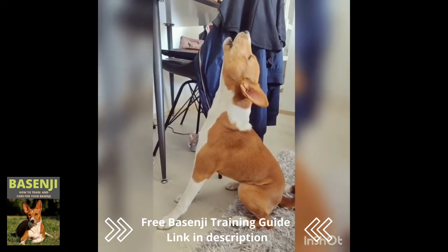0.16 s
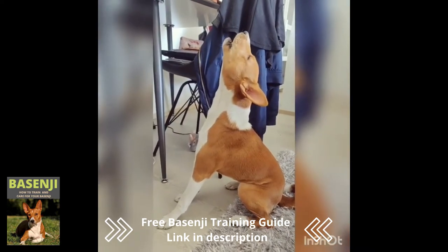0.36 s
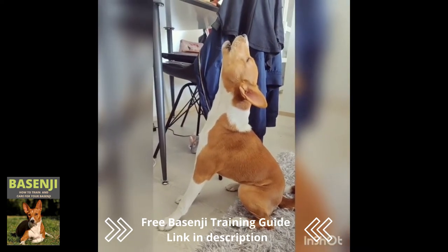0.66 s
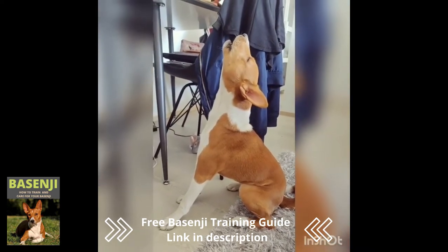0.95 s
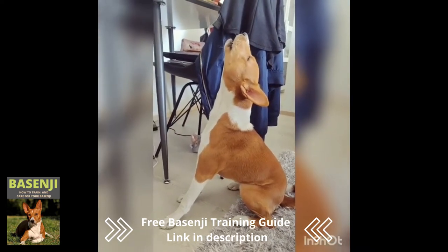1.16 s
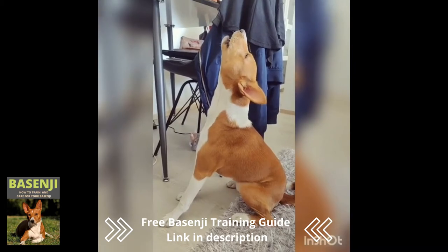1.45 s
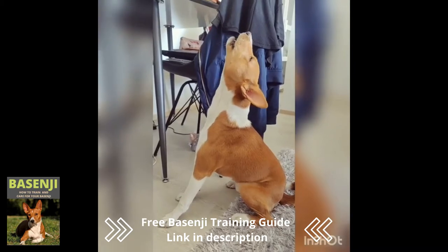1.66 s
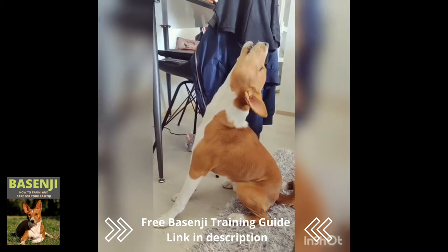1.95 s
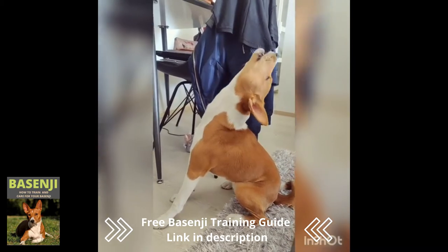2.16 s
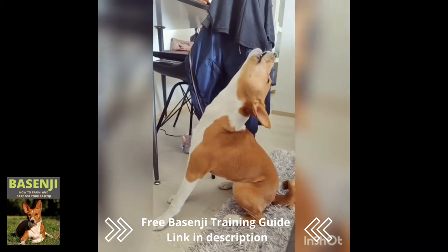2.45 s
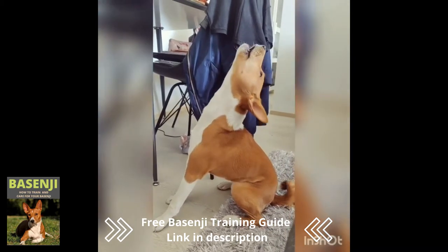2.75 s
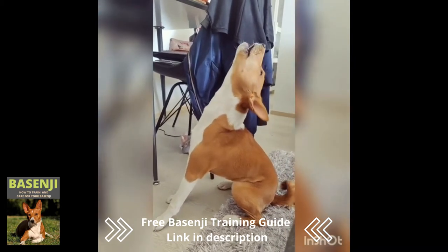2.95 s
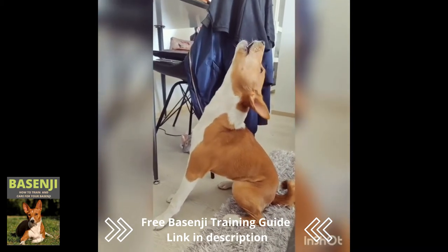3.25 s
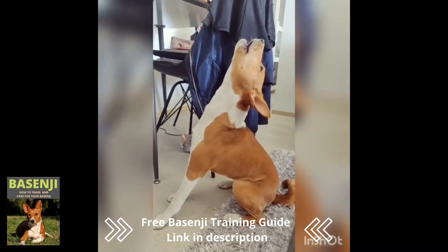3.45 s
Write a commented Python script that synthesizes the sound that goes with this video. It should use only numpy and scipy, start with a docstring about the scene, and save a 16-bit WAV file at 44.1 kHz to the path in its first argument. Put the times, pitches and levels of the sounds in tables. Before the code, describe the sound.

A dog howls twice in a small, slightly echoing room. The first call is smooth and falls gently; after a short gap, the second rises like a yodel, breaks with a rasp and settles on a held note.

```python
"""A small room, a dog yodelling: a long, nearly pure howl sinks and fades; a pause; a second call.
That one creaks, slides up, cracks to a lower register and holds on its second harmonic.
The vocal folds give the harmonics, the throat colours them and rasps, air fizzes in the muzzle.
Standing waves, set as left-right curves, push the low partials about as the pitch moves.
A faint rumble lies beneath."""
import sys
import numpy as np
from scipy import signal
from scipy.fft import rfft, irfft
from scipy.io import wavfile
from scipy.ndimage import uniform_filter1d, minimum_filter1d

SR = 44100
rng = np.random.default_rng(int(sys.argv[2]) if len(sys.argv) > 2 else 0)


def to_wav(s):
    """Save 16-bit WAV."""
    ch = np.atleast_2d(s).T  # columns
    pcm = np.round(np.clip(ch, -1, 1) * 32767)  # PCM
    wavfile.write(sys.argv[1], SR, pcm.astype(np.int16))


N = 158760
T = np.arange(N) / SR

# room decay: f/Hz, T60/s
ROOM_DECAY = [(150, 0.63), (600, 0.5), (2000, 0.46), (5000, 0.27), (12000, 0.092)]
# noise spectra: f/Hz, relative density/dB
RUMBLE_SPECTRUM = [(30, -4), (70, -7), (110, -2), (160, -3.5), (240, -8.5), (310, -2), (430, -16.5),
                   (600, -15.5), (1100, -15), (2000, -24), (5000, -36), (7500, -34), (12500, -45.5)]
FIZZ_SPECTRUM = [(1700, -36), (2500, -15.5), (3200, -3), (3700, -19.5), (4300, -2), (5200, -30),
                 (6700, -13), (7500, -22.5), (8600, -3), (10000, -21), (11000, -10.5), (12200, -10),
                 (13000, -18)]
RASP_SPECTRUM = [(100, -29.5), (330, -23), (520, -9), (700, -1), (830, 5.5), (960, 0), (1150, -16),
                 (1450, -34.5), (1880, -11), (2200, -38), (2600, -32.5), (3150, -18.5), (3650, -52),
                 (4350, -36.5), (5200, -69), (12000, -66)]
# noise envelopes: t/s, relative level/dB
FIZZ_ENVELOPE = [(.3, -65), (.85, -70), (1.2, -88.5), (2.06, -90), (2.12, -58.5), (2.35, -58.5),
                 (2.65, -59), (2.95, -57), (3.2, -66), (3.6, -67.5)]
HOWL_RASP_ENVELOPE = [(0, -43), (.3, -41.5), (.6, -41.5), (.8, -44.5), (.94, -46), (.965, -33),
                      (1.055, -34.5), (1.085, -46), (1.125, -45), (1.15, -62)]
YODEL_RASP_ENVELOPE = [(2.035, -64.5), (2.052, -42), (2.085, -37), (2.12, -39), (2.16, -54), (2.3, -50),
                       (2.57, -43), (2.6, -21), (2.628, -20), (2.655, -35), (2.72, -42), (2.85, -46),
                       (3.05, -44), (3.2, -46.5), (3.6, -47.5)]
# second fold oscillation: t/s, f/Hz, relative level/dB
SQUEAL_TRACK = [(2.57, 881, -38.5), (2.582, 862.5, -16), (2.592, 861, -29), (2.601, 857, -19.5),
                (2.612, 926, -26), (2.626, 927, -20.5), (2.655, 929, -29.5)]
# its sum tones: multiple of voice pitch added, relative level/dB
SQUEAL_SUM_TONES = [(0, 0), (1, -27), (2, -18), (4, -21)]
# notes: t/s, f/Hz, relative level/dB of harmonics 1, 2, 3, 4 and up
HOWL_TRACK = [(0.0, 634.4, -16, -41.5, -23, -33), (0.1, 628.3, -15.5, -38, -21, -31),
              (0.27, 627, -15, -37.5, -24, -33.5), (0.35, 616.7, -14, -39.5, -19, -33),
              (0.46, 613.3, -11.5, -43, -22, -35), (0.62, 607.2, -11, -51.5, -28, -40),
              (0.69, 599.6, -13, -57.5, -26.5, -40.5), (0.76, 595, -11.5, -47, -32, -41),
              (0.87, 581.6, -13, -36.5, -36.5, -47), (0.94, 575.3, -19, -43.5, -35.5, -46.5),
              (0.985, 560, -25, -33, -39, -50.5), (1.07, 560, -27, -36.5, -39.5, -59.5),
              (1.125, 585.3, -24.5, -53, -65.5, -67), (1.14, 555, -43, -52, -58, -62)]
SLIDE_TRACK = [(2.105, 367, -32.5, -42, -53.5, -49.5), (2.12, 380, -38.5, -21.5, -53, -50.5),
               (2.14, 390, -34.5, -25, -58.5, -56), (2.152, 417, -39.5, -16.5, -63.5, -48.5),
               (2.205, 418.6, -35.5, -19.5, -55, -48), (2.27, 458.2, -33, -17, -38.5, -46.5),
               (2.32, 473.5, -21.5, -23, -44.5, -44), (2.38, 511.6, -24, -25.5, -42, -34.5),
               (2.43, 549.3, -15, -28.5, -37, -36.5), (2.47, 571.6, -11, -41.5, -43, -34.5),
               (2.55, 587.5, -8.5, -44.5, -31, -28), (2.61, 574.5, -12.5, -36.5, -38.5, -35),
               (2.635, 590, -15.5, -36.5, -38.5, -39)]
HOLD_TRACK = [(2.62, 380.3, -51.5, -17, -33.5, -36.5), (2.65, 381, -29.5, -12, -41, -41.5),
              (2.675, 388.8, -38, -7.5, -53, -34.5), (2.735, 392.7, -35.5, -9.5, -48.5, -35),
              (2.765, 405.5, -29, -10, -37.5, -33.5), (2.785, 406.8, -35, -6, -38.5, -35.5),
              (2.86, 413.6, -30, -6.5, -38.5, -30.5), (2.96, 418, -32.5, -9.5, -38.5, -37),
              (3.06, 427.3, -32, -9, -40, -29.5), (3.15, 429, -38, -10.5, -37.5, -36.5),
              (3.27, 433.3, -35, -6, -40.5, -30), (3.57, 432.2, -33.5, -7, -39.5, -30.5)]
# throat response, harmonics 4 and up: f/Hz, gain/dB
HOWL_FORMANTS = [(2300, -1.5), (2520, -16.5), (2900, -5), (3150, -1), (3500, -29), (3780, -31.5),
                 (4200, -5), (4420, -12.5), (4900, -24.5), (5500, -57), (6250, -28.5), (7200, -41),
                 (8200, -35), (9600, -52), (10800, -27.5), (12600, -33)]
SLIDE_FORMANTS = [(1600, 2.5), (2000, 15.5), (2350, 0.5), (2700, -5), (3300, 5), (3900, -39.5), (4300, -5),
                  (5300, -51), (6700, -31), (8000, -40.5), (9500, -27), (10400, -44), (12400, -29.5)]
HOLD_FORMANTS = [(1600, 6.5), (1760, -5), (2050, 4), (2180, -10.5), (2600, -11), (2900, -8), (3030, 4),
                 (3300, -3), (3500, -28), (3950, -36.5), (4220, -7.5), (4310, -4.5), (4370, -13),
                 (4500, -26), (4750, -53.5), (5600, -63), (6600, -32), (7800, -42), (8600, -23.5),
                 (9800, -49.5), (10900, -28), (12100, -27.5), (13000, -36)]
# bursts of pitch scatter: t/s, half-width/s, depth/fraction of pitch
PITCH_CRACKS = [(2.085, 0.025, 0.025), (2.69, 0.086, 0.0092)]
# low partials' placement: t/s, harmonic 1 L-R/dB, harmonic 2 L-R/dB, left lead/rad
HOWL_PAN = [(0.02, 15.5, -9, 0.95), (0.12, 5, -3.5, -0.72), (0.27, 5.5, -2.5, -0.5), (0.35, -1, -10, -0.17),
            (0.55, 1, -16, -0.24), (0.76, 2.5, 11.5, -0.69), (0.88, 8, 9.5, 0.024), (1.05, 8, 9.5, 1.42)]
SLIDE_PAN = [(2.12, -9.5, 3.5, 0.1), (2.2, -7.5, -4.5, 0.24), (2.27, 9, -13, 2.32), (2.37, 13.5, 6, 2.44),
             (2.43, 3.5, 7, 1.1), (2.49, 9, -0.5, -.4), (2.6, 4, -4, -0.82)]
HOLD_PAN = [(2.66, 10, -0.5, 0.52), (2.8, 4.5, -1.5, 0.2), (2.95, 2, -2, 0.4), (3.06, -7.5, -13.5, 1),
            (3.15, -7.5, -20.5, 2), (3.25, -20.5, -9, 2.5), (3.56, -19, -10.5, 2.5)]
# howl's third harmonic: t/s, L-R/dB, left lead/rad
HOWL_THIRD_PAN = [(.3, -2.5, 2.5), (.39, -18, 2.1), (.5, 7, 1.8), (.58, -5.5, 0.9), (.66, 6, -3.5),
                  (.93, -12.5, -1.5)]
# other overtones' balance: f/Hz, L-R/dB
OVERTONE_PAN = [(1300, -0.5), (1900, -4), (2500, -6.5), (3100, -6), (4400, 2.5), (5000, -5.5), (6200, 8),
                (8200, -8), (12000, -6)]
# their phase offset: f/Hz, left lead/rad
OVERTONE_LEAD = [(1300, 0.35), (1850, 2.46), (2300, 2.5), (3050, -2), (4300, 0.86), (8000, 1)]


def amp(db):
    """Decibels to gain."""
    return 10 ** (np.asarray(db) / 20)


def at_hz(table, hz):
    """Table value on a log-frequency axis."""
    f, value = np.transpose(table)
    return np.interp(np.log(hz + 1), np.log(f + 1), value)


def curves(table):
    """Each column of a timed table, per sample."""
    times_s, *columns = np.transpose(table)
    return [np.interp(T, times_s, column) for column in columns]


def noise(colour):
    """Unit-rms noise with amplitude spectrum colour(Hz)."""
    x = irfft(rfft(rng.standard_normal(N)) * colour(np.fft.rfftfreq(N, 1 / SR)), N)
    return x / np.sqrt(np.mean(x ** 2) + 1e-20)


def wander(rate_hz):
    """Unit-rms drift, rolling off above rate_hz."""
    return noise(lambda f: 1 / (1 + (f / rate_hz) ** 2))


def gate(start_s, end_s, attack_s, release_s):
    """Window with smooth edges."""
    ramp = np.minimum((T - start_s) / attack_s, (end_s - T) / release_s)
    return np.sin(np.pi / 2 * np.clip(ramp, 0, 1)) ** 2


def room(x):
    """Dense reflections, different left and right, dying faster in the treble."""
    size = SR // 2
    taps = rng.standard_normal((2, size)) * (rng.random((2, size)) < .1) * (T[:size] > .003)
    hz, t, spectra = signal.stft(taps, SR, nperseg=256)
    decay = amp(-60 * t / at_hz(ROOM_DECAY, hz)[:, None])
    tail = signal.istft(spectra * decay, SR, nperseg=256)[1]
    tail /= np.linalg.norm(tail, axis=1, keepdims=True)
    return signal.fftconvolve(np.atleast_2d(x), tail, axes=1)[:, :N]


def rumble(level_db=-54, correlation=.86):
    """Steady room background, mostly common to both sides."""
    common, *sides = (noise(lambda f: amp(at_hz(RUMBLE_SPECTRUM, f))) for _ in range(3))
    return amp(level_db) * (np.sqrt(correlation) * common + np.sqrt(1 - correlation) * np.array(sides))


def fizz():
    """Faint high hiss of air in the muzzle."""
    air = amp(curves(FIZZ_ENVELOPE)[0]) * noise(lambda f: amp(at_hz(FIZZ_SPECTRUM, f)))
    return amp(-6) * air + amp(-10.5) * room(air)


def rasp():
    """Turbulence in the throat's resonances, strongest at the register crack."""
    howl = amp(curves(HOWL_RASP_ENVELOPE)[0]) * gate(-.02, .98, .01, .02)
    yodel = amp(curves(YODEL_RASP_ENVELOPE)[0]) * gate(2.02, 3.7, .02, .02)
    air = (howl + yodel) * noise(lambda f: amp(at_hz(RASP_SPECTRUM, f)))
    return amp(-5.5) * air + amp(-4) * room(air)


def grunt(at_s=2.076, sigma_s=.019, centre_hz=270, sigma_oct=.55, level_db=-36):
    """Short low catch in the throat."""
    body = noise(lambda f: np.exp(-(np.log2((f + 1) / centre_hz) / sigma_oct) ** 2 / 2))
    puff = body * amp(level_db) * np.exp(-((T - at_s) / sigma_s) ** 2 / 2)
    return puff + amp(-7) * room(puff)


def creak(rate_hz=95, ring_hz=807, ring_s=.0023):
    """Slow, uneven fold pulses ring the throat's main resonance as the second call starts."""
    cycles = np.cumsum(rate_hz * (1 + .17 * wander(50))) / SR
    pulses = np.diff(np.floor(cycles), prepend=0) * gate(2.052, 2.108, .03, .012)
    t = T[:SR // 20]
    ring = t / ring_s * np.exp(1 - t / ring_s) * np.sin(2 * np.pi * ring_hz * t)
    sound = 2 * amp(-28.5) * signal.fftconvolve(pulses, ring)[:N]
    return sound + amp(-4) * room(sound)


def squeal(jitter=.015):
    """Second fold oscillation near 1.5 times the pitch; rattles against the voice at the crack."""
    hz, level_db = curves(SQUEAL_TRACK)
    phase = 2 * np.pi * np.cumsum(hz * (1 + jitter * wander(100))) / SR
    voice_phase = 2 * np.pi * np.cumsum(curves(SLIDE_TRACK)[0]) / SR
    tones = sum(amp(db) * np.sqrt(2) * np.sin(phase + k * voice_phase) for k, db in SQUEAL_SUM_TONES)
    sound = amp(level_db) * tones * gate(2.53, 2.67, .02, .02)
    return sound + amp(-7) * room(sound)


def partial(phase, level_db, pan_db, lead_rad):
    """One harmonic, offset in level and phase between left and right."""
    sides = np.array([[.5], [-.5]])
    gains = amp(sides * pan_db)
    return 2 * amp(level_db) * gains / np.linalg.norm(gains, axis=0) * np.cos(phase + sides * lead_rad)


def note(track, pan, formants, envelope, top_harmonic, upper_trim_db, shimmer_db,
         third_send_db, upper_send_db, low_send_db=-19.5, third_pan=None):
    """Fold harmonics coloured by the throat; returns direct sound and room send."""
    hz, first_db, second_db, third_db, upper_db = curves(track)
    jitter = .0022 * wander(25.2)
    flutter = .00068 * wander(107)
    scatter = sum(depth * np.exp(-((T - at_s) / width_s) ** 2) for at_s, width_s, depth in PITCH_CRACKS)
    pitch_hz = hz * (1 + jitter + flutter + scatter * wander(140))
    phase = 2 * np.pi * np.cumsum(pitch_hz) / SR
    first_pan_db, second_pan_db, lead_rad = curves(pan)
    roughness = 1 + .066 * noise(lambda f: np.exp(-(f / 88) ** 2))  # cycle-to-cycle strength

    def overtone(k, level_db, place=None):
        """Unsteady harmonic k, placed by its frequency by default."""
        place = place or (at_hz(OVERTONE_PAN, k * hz), at_hz(OVERTONE_LEAD, k * hz))
        return roughness * partial(k * phase, level_db + shimmer_db * wander(28), *place)

    low = partial(phase, first_db, first_pan_db, lead_rad)
    low += partial(2 * phase, second_db, second_pan_db, lead_rad)
    third = overtone(3, third_db, third_pan and curves(third_pan))
    upper = sum(overtone(k, upper_db + upper_trim_db + at_hz(formants, k * hz))
                for k in range(4, top_harmonic + 1))
    send = amp(low_send_db) * low + amp(third_send_db) * third + amp(upper_send_db) * upper
    return np.array([low + third + upper, send]) * envelope


def voice():
    """Sinking howl, then slide and held note overlapping at the crack; overtones echo more."""
    howl = note(HOWL_TRACK, HOWL_PAN, HOWL_FORMANTS, gate(-.02, 1.155, .01, .014), top_harmonic=21,
                upper_trim_db=-5, shimmer_db=.7, third_send_db=-11.5, upper_send_db=0,
                third_pan=HOWL_THIRD_PAN)
    slide = note(SLIDE_TRACK, SLIDE_PAN, SLIDE_FORMANTS, gate(2.08, 2.65, .036, .016), top_harmonic=29,
                 upper_trim_db=-10, shimmer_db=1.5, third_send_db=-10, upper_send_db=-6)
    hold = note(HOLD_TRACK, HOLD_PAN, HOLD_FORMANTS, gate(2.6, 3.7, .024, .02), top_harmonic=31,
                upper_trim_db=-9, shimmer_db=1.14, third_send_db=-10.5, upper_send_db=-6.5)
    direct, send = howl + slide + hold
    return direct + room(send)


def scene():
    """The dog in its room."""
    return voice() + squeal() + creak() + rasp() + fizz() + grunt() + rumble()


def record(dry):
    """Fast peak limiter, then low-pass."""
    ceiling, cutoff_hz = .64, 13050
    gain = np.minimum(1, ceiling / (abs(dry).max(0) + 1e-9))
    held = minimum_filter1d(gain, size=600)
    smoothed = uniform_filter1d(uniform_filter1d(held, size=300), size=300)
    lowpass = signal.firwin(511, cutoff_hz, window=("kaiser", 9), fs=SR)
    return signal.oaconvolve(dry * smoothed, lowpass[None], "same")


dry = scene()
out = record(dry)
to_wav(out)
```